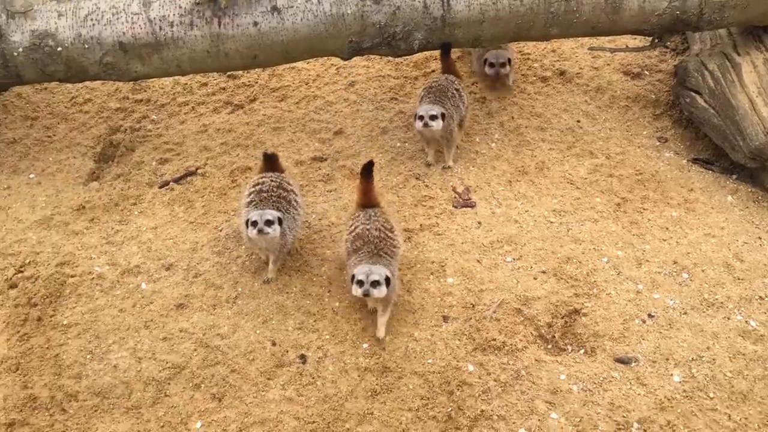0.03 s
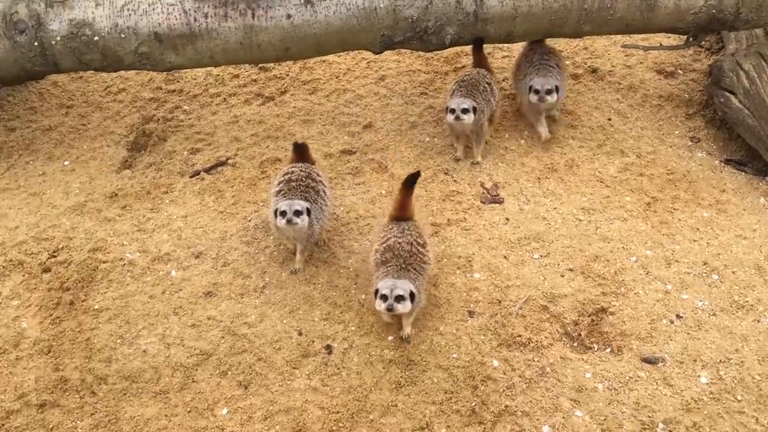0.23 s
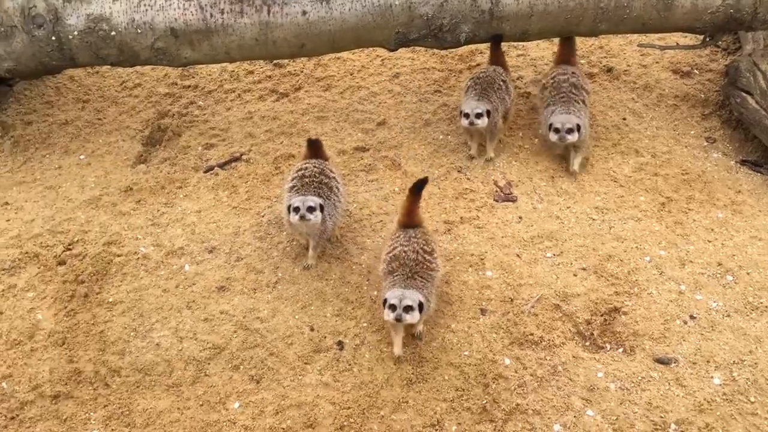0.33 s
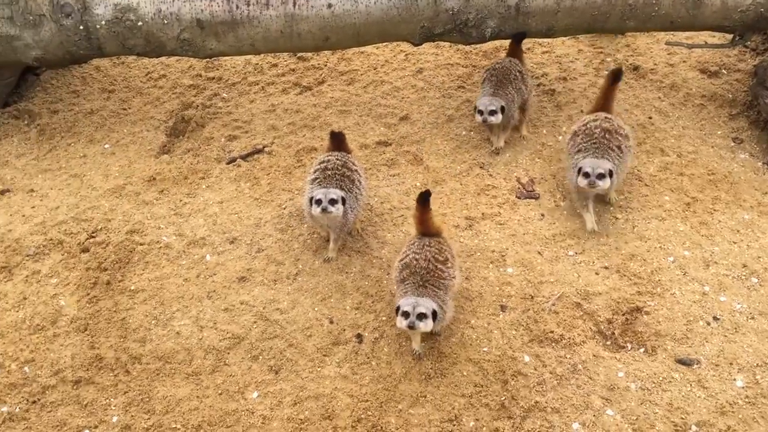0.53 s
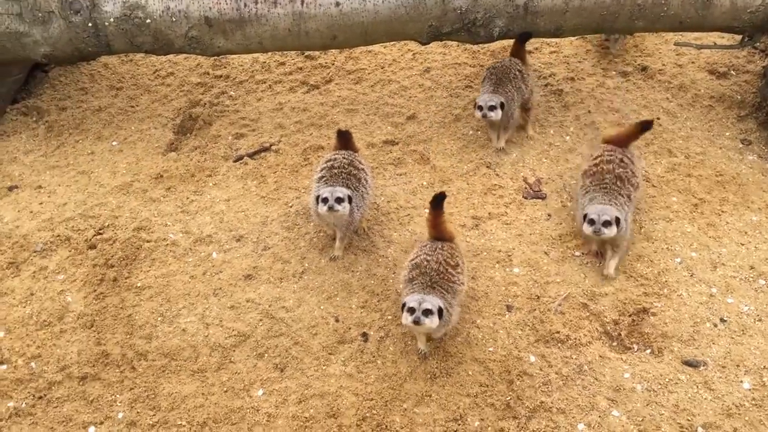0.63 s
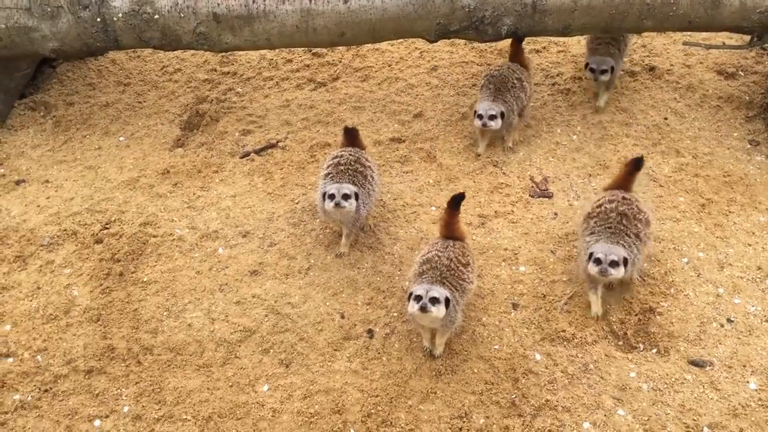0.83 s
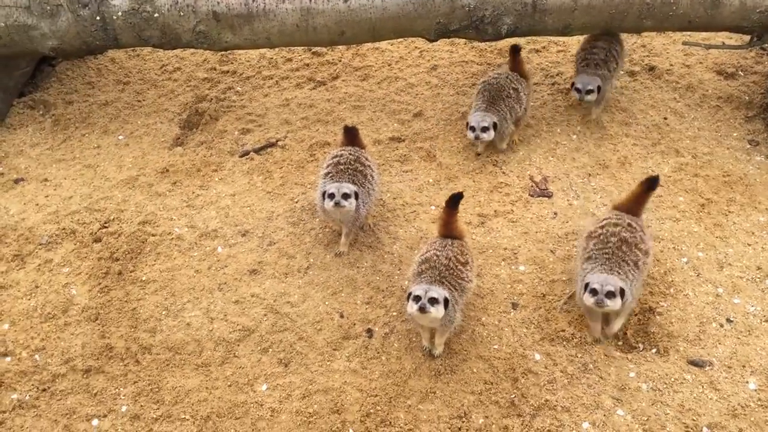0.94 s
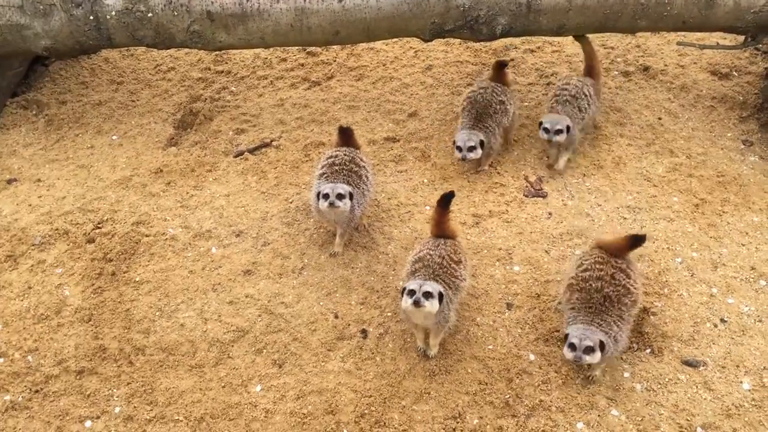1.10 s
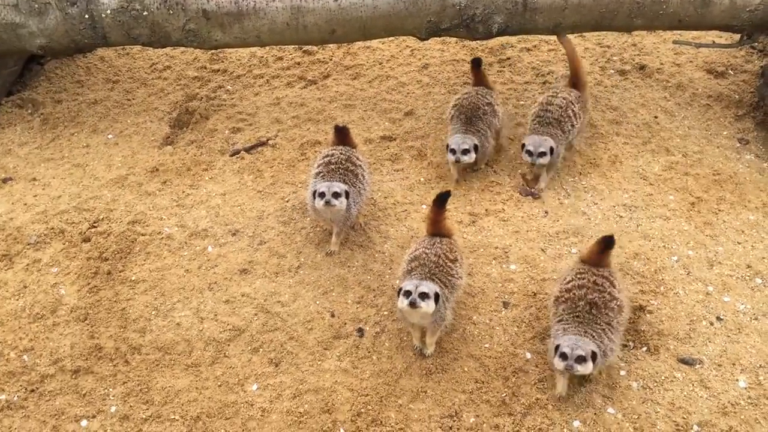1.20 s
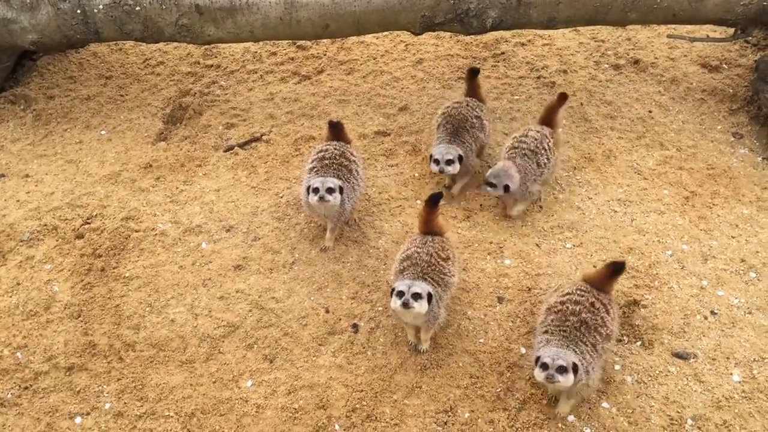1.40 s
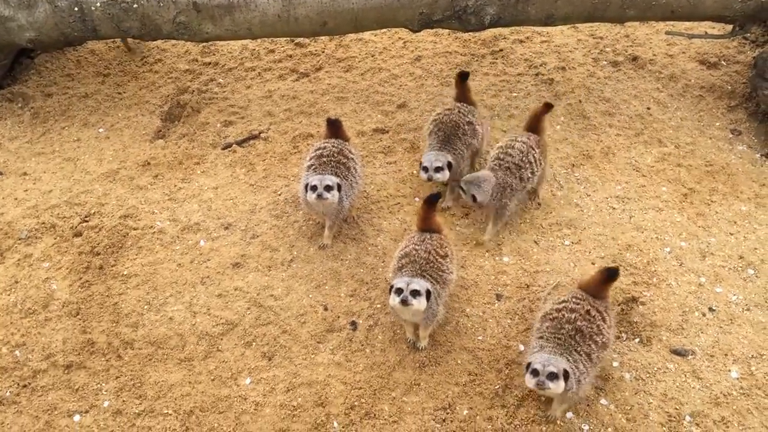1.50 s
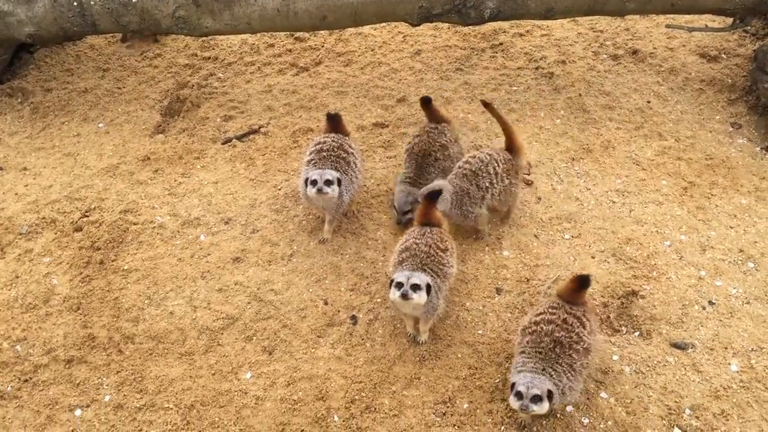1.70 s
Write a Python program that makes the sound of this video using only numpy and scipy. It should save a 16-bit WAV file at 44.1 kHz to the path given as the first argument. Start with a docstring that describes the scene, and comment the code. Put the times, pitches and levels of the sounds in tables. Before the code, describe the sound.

Thin high birdsong with a quick trill, while meerkats grunt softly and pad on sand.

```python
"""An outdoor enclosure. A small songbird sings thin high whistles, two clear pips and a trill of eight
hooked notes, with softer slurs before and after; a faint far whistle and two peeps open the scene.
Each note is a gliding, nearly pure tone from the syrinx, thrown back by the ground and walls.
Close by are two short low grunts, probably from meerkats: throat pulses ringing the chest and mouth.
Soft steps on sand and a few ticks of grit lie over a quiet bed of rumble and hiss."""
import sys
import numpy as np
from scipy import signal
from scipy.fft import rfft, irfft
from scipy.io import wavfile
from scipy.ndimage import uniform_filter1d

SR = 44100
rng = np.random.default_rng(int(sys.argv[2]) if len(sys.argv) > 2 else 0)


def unload_audio(sound):
    """Save the sound as a 16-bit wav file, at the path given as the first command line argument."""
    columns = np.transpose(np.atleast_2d(sound))
    # keep every value between -1 and 1, then stretch to whole-number steps
    steps = np.round(np.clip(columns, -1, 1) * 32767)
    wavfile.write(sys.argv[1], SR, steps.astype(np.int16))


N = 77175


def undb(db):
    """Decibels to gain."""
    return 10 ** (np.asarray(db) / 20)


def unit(x):
    """Scale to rms 1."""
    return x / np.sqrt(np.mean(x ** 2) + 1e-20)


def clock():
    """Time of every sample, in seconds."""
    return np.arange(N) / SR


def walk(rate_hz):
    """Smooth random wander with rms 1."""
    span = max(int(SR / rate_hz), 1)
    return unit(uniform_filter1d(uniform_filter1d(rng.standard_normal(N), span), span))


def ring(x, hz, width_hz):
    """One resonance, gain 1 at its centre."""
    return signal.lfilter(*signal.iirpeak(hz, hz / width_hz, fs=SR), x)


def steep_ring(x, hz, width_hz):
    """A resonance with its skirts steepened by a second one twice as wide."""
    return ring(ring(x, hz, width_hz), hz, 2 * width_hz)


def enclosure(x, wet_db, echo_db):
    """The direct sound, a few distinct echoes, then a short diffuse tail."""
    # reflections off the ground and walls: delay_s, level_db (before echo_db is added)
    echoes = [(.0031, -12.5), (.0075, -13), (0.0133, -17.5), (.019, -21.5), (.027, -26)]
    t60_s, build_s = 0.4, 0.011
    t = clock()
    tail = rng.standard_normal(N) * undb(-60 * t / t60_s) * (1 - np.exp(-t / build_s))
    response = undb(wet_db) * unit(tail) / np.sqrt(N)
    response[0] = 1
    for delay_s, level_db in echoes:
        response[int(delay_s * SR)] += undb(level_db + echo_db)
    return signal.fftconvolve(x, response)[:N]


def syrinx(times, hz, db, waver, flutter_db, edge_s=0.0025):
    """One note: a pure tone glides along its curve, trembling in pitch (by the share waver) and level."""
    tremor_hz = 498
    t, times = clock(), np.sort(times)
    glide = uniform_filter1d(np.interp(t, times, hz), size=60)
    pitch = glide * (1 + waver * walk(tremor_hz))
    level = undb(np.interp(t, times, db) + flutter_db * walk(tremor_hz))
    opening = np.clip(.5 + np.minimum(t - times[0], times[-1] - t) / edge_s, 0, 1)
    envelope = level * np.sin(np.pi / 2 * opening) ** 2
    return np.sqrt(2) * envelope * np.sin(2 * np.pi * np.cumsum(pitch) / SR)


def phrase(notes, **voicing):
    """Several gliding notes sung with the same voicing."""
    return sum(syrinx(*np.array(note).T, **voicing) for note in notes)


def air():
    """A quiet bed of outdoor rumble and hiss, its level gently wandering."""
    # tone colour of the bed: frequency_hz, relative_db
    spectrum = [(20, -24), (35, -10), (55, 2.5), (100, -0.5), (200, 1), (330, -4.5), (500, -10),
                (950, -7.5), (1500, -14.5), (2600, -20), (5000, -25.5), (9000, -28.5), (15500, -31.5)]
    level_db, swell_db = -67, 0.5
    hz, db = np.array(spectrum).T
    bin_hz = np.arange(N // 2 + 1) * SR / N
    colour = undb(np.interp(np.log(bin_hz + 1), np.log(hz), db))
    level = undb(level_db - swell_db * walk(6))
    return level * unit(irfft(rfft(rng.standard_normal(N)) * colour, N))


def far_calls():
    """A faint far whistle in two voices, and two short, lower peeps."""
    # one curve per tone: time_s, pitch_hz, level_db
    notes = [
        [(.024, 2960, -78), (.045, 3077, -66.5), (.076, 3103, -63), (.106, 3135, -64.5), (.115, 3100, -67.5)],
        [(.030, 3440, -75), (.075, 3400, -69.5), (.118, 3410, -74)],
        [(.019, 2380, -70), (.026, 2160, -73), (.035, 1930, -71)],
        [(.114, 1850, -76), (.123, 1840, -70), (.133, 1790, -68)],
    ]
    calls = phrase(notes, waver=0.0014, flutter_db=2, edge_s=.007)
    return enclosure(calls, wet_db=-22, echo_db=-3.5)


def steps():
    """Paws pad on the sand, each a dull puff of low noise."""
    # footfalls: start_s, pitch_hz, level_db
    footfalls = [(0.072, 173, -64.5), (0.234, 124, -67.5), (0.924, 70.5, -59.5), (.93, 224, -64.5),
                 (1.024, 58, -66), (1.08, 256, -65), (1.298, 185, -60.5), (1.388, 213, -62),
                 (1.418, 107, -59.5), (1.497, 203, -61)]
    rise_s = 0.0097
    out, t = 0, clock()
    for start_s, pitch_hz, level_db in footfalls:
        age = np.maximum(t - start_s, 0) / rise_s
        thud = unit(steep_ring(rng.standard_normal(N), pitch_hz, pitch_hz / 2))
        out += undb(level_db) * age * np.exp(1 - age) * thud
    return out


def slurs():
    """Softer sliding notes with eased edges, before and after the main song."""
    # one curve per slur: time_s, pitch_hz, level_db
    notes = [
        [(.093, 5350, -74), (.099, 5830, -69), (.103, 4980, -75), (.111, 4150, -70)],
        [(1.255, 4400, -61), (1.274, 4206, -61), (1.290, 4030, -54.5), (1.304, 3820, -58.5)],
        [(1.311, 3136, -71), (1.320, 3715, -60.5), (1.333, 4076, -68.5), (1.348, 4084, -53)],
        [(1.371, 5980, -76), (1.383, 6240, -58), (1.399, 5490, -54), (1.411, 5480, -52.5), (1.432, 6004, -56.5),
         (1.446, 6480, -56), (1.458, 5484, -55.5), (1.478, 5460, -59), (1.507, 6490, -60.5), (1.532, 6520, -71)],
        [(1.491, 4390, -72), (1.500, 5080, -59), (1.512, 4550, -56), (1.528, 3805, -56), (1.535, 3200, -71.5)],
        [(1.565, 4570, -57.5), (1.575, 4340, -57.5), (1.585, 3800, -62)],
        [(1.581, 5700, -71), (1.596, 5680, -55), (1.605, 5180, -51), (1.623, 4500, -57)],
        [(1.624, 5400, -51), (1.636, 5100, -81), (1.649, 5800, -62), (1.668, 4880, -62.5), (1.685, 5490, -65),
         (1.700, 4550, -61)],
        [(1.703, 5500, -62), (1.718, 5375, -50), (1.732, 5590, -59.5), (1.750, 5550, -56)],
    ]
    song = phrase(notes, waver=0.00578, flutter_db=2, edge_s=.007)
    return enclosure(song, wet_db=-4, echo_db=-4)


def whistles():
    """Two voices of the syrinx beat together; a weak octave arrives mostly by way of the walls."""
    # one curve per thin high whistle: time_s, pitch_hz, level_db
    first_voice = [
        [(.175, 5800, -59), (.181, 7150, -58), (.192, 7750, -53), (.207, 7870, -63), (.216, 7450, -50),
         (.238, 7580, -44), (.248, 7330, -44), (.258, 7500, -59.5), (.268, 7300, -43.5), (.283, 7280, -54.5),
         (.294, 7000, -49)],
        [(.324, 6300, -50), (.331, 7450, -44), (.337, 7950, -52), (.344, 7450, -44), (.353, 8050, -50.5),
         (.366, 7400, -62), (.376, 7420, -44.5), (.394, 7350, -47.5), (.399, 7400, -54.5)],
        [(.414, 7550, -55), (.428, 7630, -52), (.435, 7650, -46.5), (.439, 7350, -43), (.446, 7450, -58.5)],
        [(.489, 6600, -48), (.494, 7400, -43), (.498, 8000, -53.5), (.510, 7450, -55), (.518, 7650, -51),
         (.527, 7950, -56.5), (.535, 7450, -46.5), (.544, 8000, -58.5), (.553, 7750, -48), (.566, 7670, -44.5),
         (.575, 7300, -54.5)],
        [(.591, 5200, -65), (.595, 7100, -49.5), (.599, 7530, -43), (.605, 7600, -48), (.612, 7870, -55.5),
         (.620, 7480, -49.5), (.627, 7550, -46)],
    ]
    # curves of the voice that joins some whistles: time_s, pitch_hz, level_db
    second_voice = [
        [(.204, 7420, -46.5), (.218, 6300, -70), (.231, 6230, -61), (.245, 5930, -64)],
        [(.259, 7810, -55.5), (.271, 7870, -59.5), (.287, 7760, -50.5), (.297, 7300, -52)],
        [(.326, 6300, -65), (.338, 7150, -59), (.352, 7300, -44.5), (.363, 7100, -56)],
        [(.371, 7890, -48.5), (.386, 8240, -64.5), (.397, 8170, -50)],
        [(.497, 7150, -50), (.508, 7850, -45), (.520, 7250, -54), (.538, 7900, -48), (.551, 7300, -57.5),
         (.562, 7300, -51.5), (.572, 7750, -44.5)],
        [(.604, 7800, -50), (.613, 7300, -55), (.624, 7800, -48.5)],
    ]
    # octave overtone of each whistle: relative_db
    overtones = [-31.5, -26.5, -33, -22, -29]
    voicing = dict(waver=0.0165, flutter_db=0)
    voices = phrase(first_voice + second_voice, **voicing)
    octave = 0
    for note, relative_db in zip(first_voice, overtones):
        times, hz, db = np.array(note).T
        octave += syrinx(times, 2 * hz, db + relative_db, **voicing)
    return enclosure(voices, wet_db=-12, echo_db=2.5) + enclosure(octave, wet_db=-3.5, echo_db=10.5)


def grit():
    """Now and then a grain of grit ticks underfoot: a tiny spike of bright noise."""
    # grains: peak_s, level_db, pitch_hz
    ticks = [(0.304, -64, 5000), (0.477, -64, 10100), (.693, -63.5, 5730), (1.489, -62.5, 8000)]
    decay_s = 0.00062
    out, t = 0, clock()
    for peak_s, level_db, pitch_hz in ticks:
        spike = np.exp(-np.abs(t - peak_s) / decay_s)
        out += undb(level_db) * spike * unit(ring(rng.standard_normal(N), pitch_hz, pitch_hz / 2))
    return out


def pips():
    """Two clear, steady pips, each dropping in pitch as it closes."""
    # one curve per pip: time_s, pitch_hz, level_db
    notes = [
        [(.685, 3350, -49.5), (.694, 3272, -42), (.706, 3316, -39.5), (.722, 3334, -34.5), (.728, 3345, -40.5),
         (.737, 3046, -47)],
        [(.742, 3287, -54), (.749, 3480, -43), (.753, 3608, -39), (.769, 3584, -33), (.775, 3460, -35),
         (.781, 3050, -42.5)],
    ]
    song = phrase(notes, waver=0.0014, flutter_db=0.06)
    return enclosure(song, wet_db=-11, echo_db=-0.5)


def grunts():
    """Uneven throat pulses and a throbbing rasp ring the chest and mouth, swelling and fading."""
    # grunts: peak_s, half_length_s, pulse_rate_hz, level_db, chest_hz, mouth_gain_db
    calls = [(0.818, 0.052, 80, -51.5, 223.5, -2.5), (1.605, 0.047, 170, -57.5, 346, -2.5)]
    # mouth resonances: centre_hz, width_hz, gain_db
    formants = [(696, 172, -7), (852, 106, -14), (1740, 180, -23.5)]
    jitter, shimmer_db, chest_width_hz = .2, 2, 47.5
    rasp_gain, throb_hz, throb_depth = 0.052, 55, 0.51
    out, t = 0, clock()
    throb = 1 + throb_depth * np.cos(2 * np.pi * throb_hz * t)
    for peak_s, half_length_s, rate_hz, level_db, chest_hz, mouth_gain_db in calls:
        cycles = np.floor(np.cumsum(rate_hz * np.exp(jitter * walk(rate_hz))) / SR)
        pulses = np.diff(cycles, prepend=0) * undb(shimmer_db * walk(rate_hz))
        rasp = rasp_gain * rng.standard_normal(N) * throb
        swell = np.exp(-np.abs((t - peak_s) / half_length_s) ** 3)
        throat = (pulses + rasp) * swell
        chest = steep_ring(throat, chest_hz, chest_width_hz)
        mouth = sum(undb(db) * steep_ring(throat, hz, width_hz) for hz, width_hz, db in formants)
        voice = unit(chest + undb(mouth_gain_db) * mouth)
        out += undb(level_db) * voice * np.sqrt(np.mean(swell ** 2))  # about level_db at the crest
    return enclosure(out, wet_db=-10, echo_db=-17)


def trill():
    """Eight hooked notes: each arches up, weakens at the top and sweeps steeply down."""
    # notes of the trill: top_s, pitch_hz, length_ratio, rise_db, fall_db
    notes = [(0.806, 5230, .92, -54.5, -38.5), (0.859, 5490, 1.1, -49, -40), (0.91, 5443, 0.88, -47, -40.5),
             (.962, 5457, 0.86, -45, -40.5), (1.016, 5380, 0.79, -44, -41), (1.076, 5344, 0.79, -45.5, -40),
             (1.132, 5226, 0.96, -45.5, -49), (1.196, 5003, 1.2, -45.5, -51)]
    # the hook that shapes every note: offset_from_top_s, pitch_ratio, relative_db
    hook = [(-.012, .80, -1.5), (-.009, .85, -0.5), (-.004, .905, -5), (0, 0.98, -11), (.002, .86, -9),
            (.005, .77, -0.5), (.010, 0.64, -4.5), (.014, 0.58, -9)]
    offset_s, pitch_ratio, relative_db = np.array(hook).T
    falling = np.arange(len(hook)) > np.argmax(pitch_ratio)
    song = 0
    for top_s, pitch_hz, length_ratio, rise_db, fall_db in notes:
        times = top_s + length_ratio * offset_s
        level_db = relative_db + np.where(falling, fall_db, rise_db)
        song += syrinx(times, pitch_hz * pitch_ratio, level_db, waver=0.0116, flutter_db=3)
    return enclosure(song, wet_db=-10.5, echo_db=3.5)


def scene():
    """Birdsong and the animals on the sand, over the bed of air, in mono."""
    birdsong = pips() + slurs() + far_calls() + whistles() + trill()
    return (birdsong + grunts() + steps() + grit() + air())[None]


def record(dry):
    """A steep low-pass cuts the very top of the treble."""
    cutoff_hz = 15700
    return signal.sosfilt(signal.ellip(14, .2, 70, cutoff_hz, fs=SR, output="sos"), dry)


dry = scene()
out = record(dry)
unload_audio(out)
```